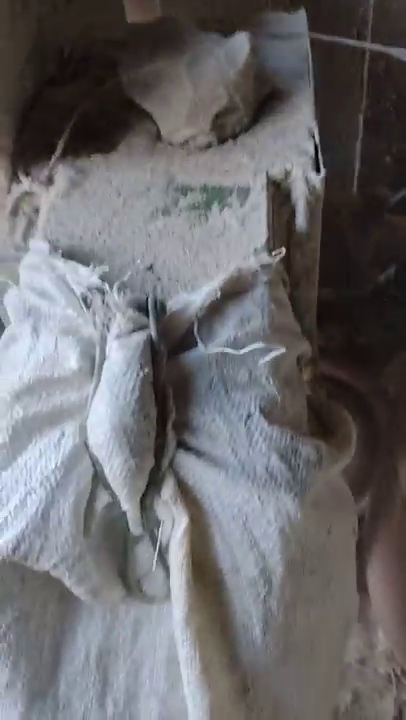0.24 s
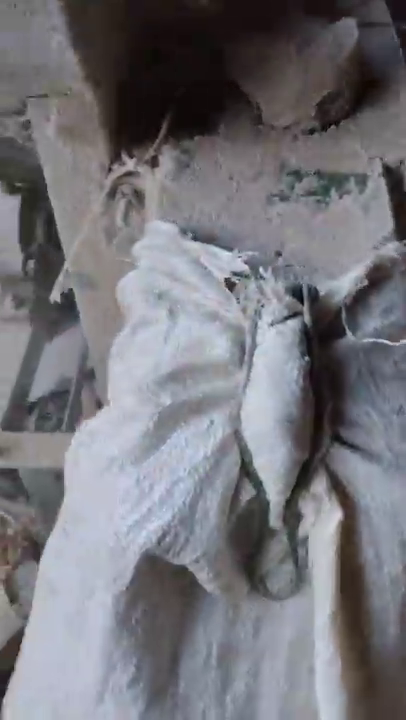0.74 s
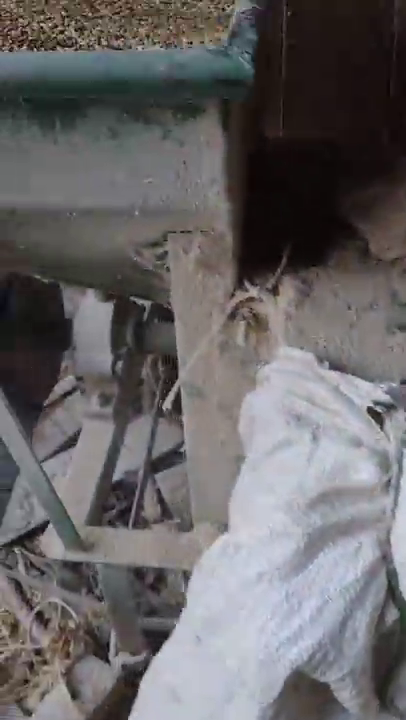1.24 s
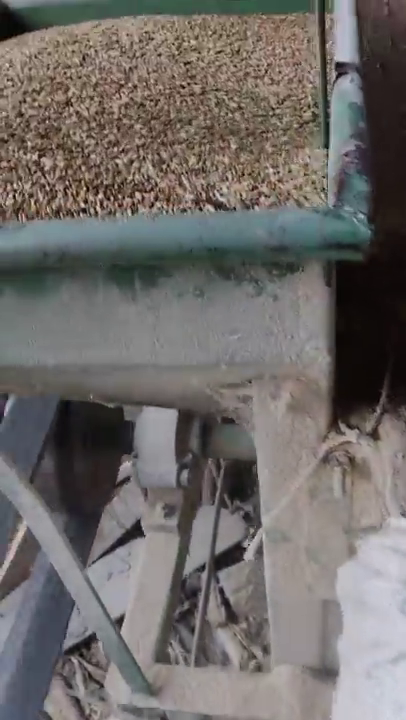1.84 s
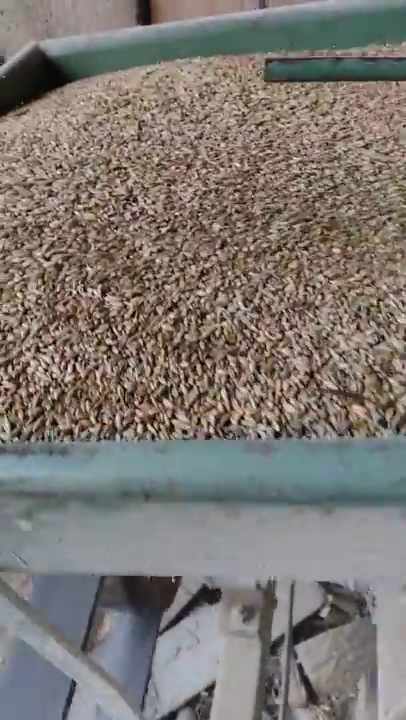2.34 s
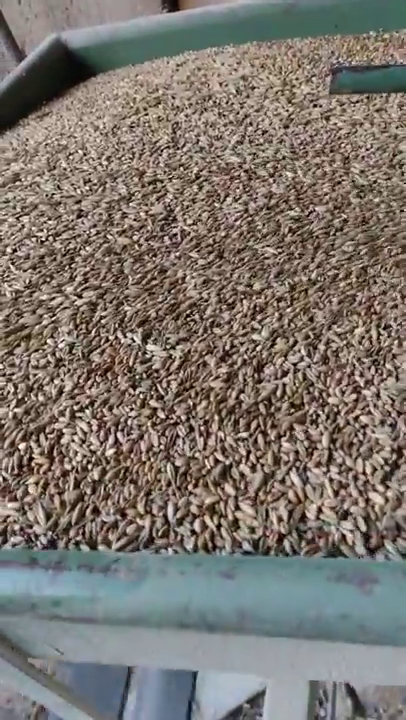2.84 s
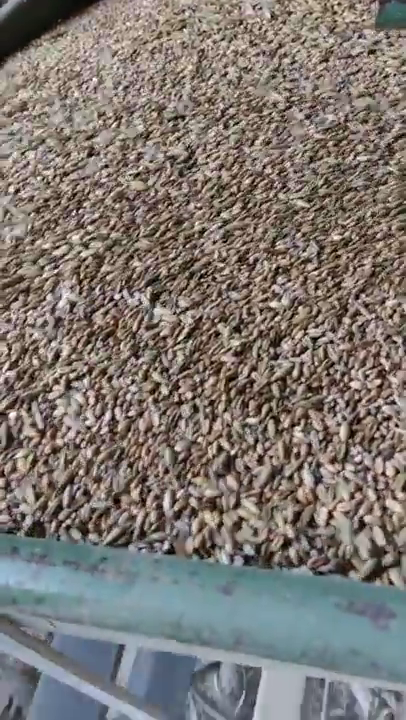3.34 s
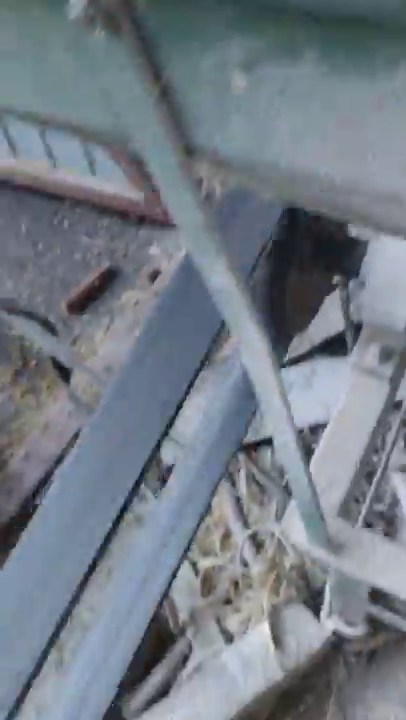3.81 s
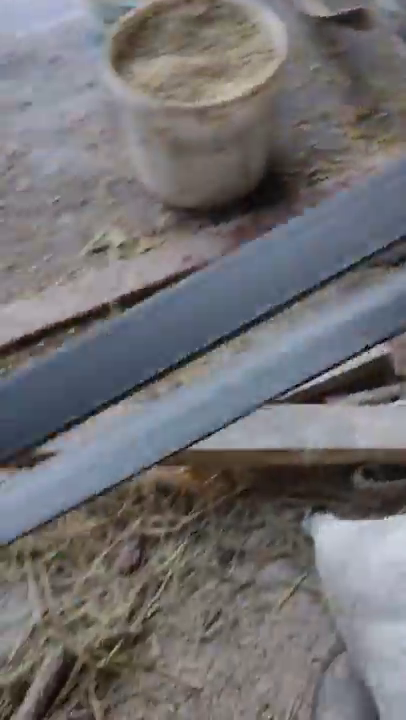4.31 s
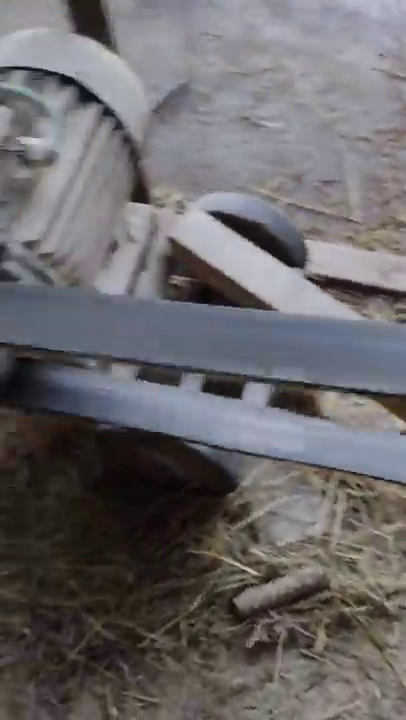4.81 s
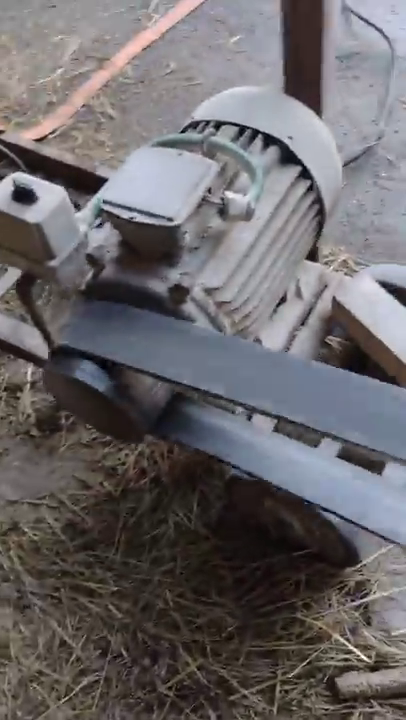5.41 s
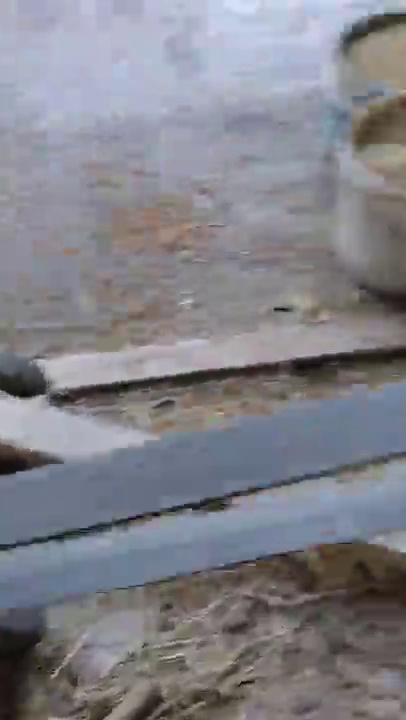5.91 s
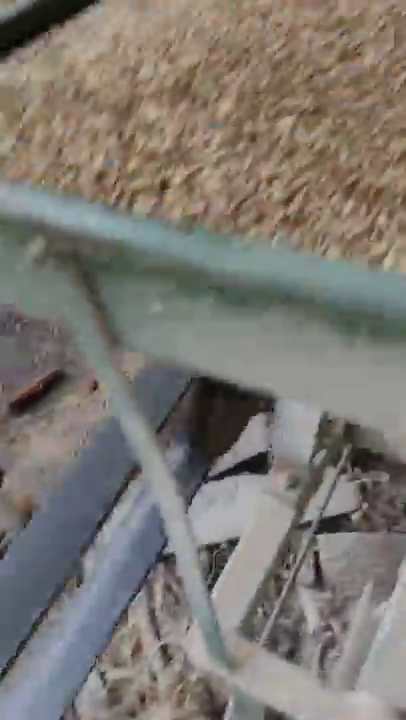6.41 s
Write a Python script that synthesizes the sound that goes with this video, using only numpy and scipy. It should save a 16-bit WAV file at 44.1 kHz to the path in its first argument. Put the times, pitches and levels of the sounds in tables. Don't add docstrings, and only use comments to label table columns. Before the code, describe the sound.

Inside a farm shed, a belt-driven mill grinds grain without pause. A bright, gritty hiss of cracking kernels rides on a low throbbing hum. The belt joint ticks about three times a second, with lighter snaps between, amid random rattles and casing knocks. A handheld stereo microphone moves from the chute past the hopper to the motor and back, its level fluttering.

```python
import sys
import numpy as np
from scipy import signal
from scipy.fft import rfft, irfft, next_fast_len
from scipy.io import wavfile
from scipy.ndimage import uniform_filter1d, map_coordinates

SR = 44100
rng = np.random.default_rng(int(sys.argv[2]) if len(sys.argv) > 2 else 0)


def store_wav(level_fs):
    pcm = np.round(np.clip(np.atleast_2d(level_fs), -1, 1) * 32767)
    wavfile.write(sys.argv[1], SR, pcm.T.astype(np.int16))


def gain_from_decibels(decibels):
    exponent = np.asarray(decibels, float) / 20
    return 10 ** exponent


N = 293706

# start_s, loudness_db, left_minus_right_db, stone_view_db
WALK_PATH = [(0.0, -28, 4, 1), (0.56, -26, 3, 1), (1.11, -28.5, 6.5, -0.5), (1.67, -26, 4.5, -0.9),
             (2.22, -25.5, 3, -0.9), (2.78, -24, 4.5, -1), (3.33, -25, 3, -1.5), (3.89, -23.5, 4.5, -1.5),
             (4.44, -20, 2.3, -3), (5.0, -25.5, 2, -6.5), (5.55, -22.5, -0.5, -6.5), (6.11, -29, 5, -4.5),
             (6.66, -22.5, 2.5, -0.5)]
# start_s, low_panel_facing_db, high_panel_facing_db, left_lag_samples, extra_shaft_path_m
MILL_BEARING = [(0, -6, -5, 1.5, 0.09), (.7, -2.5, -2.5, -2.5, 0.43), (1.35, 1.5, -1, 0, -0.32),
                (1.8, 3, 0.5, 3.5, 0.4), (2.25, 6, 2, 9, 1.26), (2.75, 4, -2, 6.5, 1.12),
                (3.25, 2.5, -2.5, 9, 1.41), (3.6, 5.5, -0.5, -2, 1.07), (3.9, 4, -2.5, -4, 0.76),
                (4.2, -9, -3.5, -7.5, 1.23), (4.75, -1.5, -4, -3.5, 0.2), (5.25, -9, -8, 8, 0.46),
                (5.75, -10, -4, 3.5, 0.11), (6.2, -7, -2.5, 9, -1.04), (6.66, 10, 1, 16, -1.68)]
LOW_PAN_DB, HIGH_PAN_DB = -1.5, -0.36
# freq_hz, likeness_0_to_1
PORT_LIKENESS = [(60, 0.9), (290, 0.9), (640, 0.66), (1400, 0.22), (3000, 0.1), (6000, 0.035),
                 (16000, 0.041)]

HUM_DB, HOUSING_DB, CRUSH_DB, HISS_DB, RING_DB = -1.58, -3, 1.5, 8, 28.5
HUM_PER_FACING, CRUSH_PER_FACING = 0.14, 0.035
DEEP_PER_FACING, DEEP_PER_VIEW = -0.53, -0.44
HOUSING_PER_VIEW = -0.29
CRUSH_PER_VIEW = 0.2

SHAFT_HZ = 17.29
SHAFT_ORDERS = [(1, -63), (2, -55), (3, -38.5), (4, -38), (5, -32.5), (6, -86), (7, -44), (8, -38),
                (9, -41.5), (10, -42.5), (11, -46), (12, -40.5), (13, -103), (14, -45), (15, -42),
                (16, -50), (17, -62), (18, -53), (19, -43), (20, -44), (21, -41.5), (22, -84), (23, -69),
                (24, -48)]
# freq_hz, density_db_per_hz
RUMBLE_SPECTRUM = [(25, 11), (40, 8), (55, 15), (75, 14.5), (110, 18), (160, 11.5), (230, 13.5),
                   (300, 20.5), (370, 13), (420, 9), (550, 13)]

LAP_S, STRONGEST_FLAP_S = 0.2967, 0.1
FLAP_SWING_DB, LAP_SWING_DB = 4, 0.5
FLAP_DB, FLAP_PER_FACING = -0.5, 0.11

# pitch_hz, left_db, right_db, wander_hz
BEARING_WHINES = [(1077, -44.5, -52, 9.0), (2140, -46, -47, 18.0)]
# pitch_hz, width_hz, left_db, right_db
HOUSING_PANELS = [(978, 140, -42, -46.5), (1092, 67, -44, -47.5), (1761, 31, -72, -44.5),
                  (2140, 170, -40, -39), (2453, 140, -41, -66), (4200, 160, -80, -55),
                  (5530, 500, -40.5, -52)]

# start_s, peak_db, pitch_hz
FRAME_THUMPS = [(0.022, -22, 211), (0.084, -13.5, 158), (0.146, -18, 151), (0.376, -19, 180),
                (0.434, -12.5, 137), (0.512, -28, 302), (0.661, -20, 142), (1.125, -17, 140),
                (1.356, -22, 137), (1.412, -20, 146), (1.473, -32, 164), (1.588, -21, 136),
                (1.643, -21, 139), (1.763, -23, 178), (1.878, -27, 157), (1.937, -19, 183),
                (1.99, -21, 213), (2.055, -23, 178), (2.127, -18, 280), (2.172, -11, 182),
                (2.227, -15, 135), (2.28, -22, 203), (2.441, -8, 135), (2.521, -12, 186),
                (2.591, -13.5, 203), (2.682, -16, 161), (2.747, -10.5, 137), (2.824, -16.5, 285),
                (2.919, -14.5, 144), (2.978, -16, 130), (3.034, -12, 133), (3.098, -9, 137),
                (3.202, -15, 145), (3.271, -14, 135), (3.319, -13.5, 145), (3.433, -13, 178),
                (3.496, -9.5, 137), (3.612, -24, 151), (3.656, -18, 141), (3.793, -17.5, 176),
                (3.845, -27, 132), (4.022, -22.5, 187), (4.314, -21, 183), (4.39, -17, 308),
                (4.599, -21, 137), (4.681, -20, 307), (4.77, -28, 186), (4.831, -19, 144),
                (4.953, -20, 356), (5.118, -9, 141), (5.269, -25, 279), (5.345, -19, 110),
                (5.388, -31, 140), (5.558, -8.5, 112), (5.703, -12.5, 304), (5.858, -29, 156),
                (5.927, -19, 135), (6.098, -19, 343), (6.388, -15, 192), (6.501, -30, 135),
                (3.543, -23, 339), (3.658, -32, 366), (4.39, -21, 325), (5.129, -19, 333),
                    (5.149, -19, 606), (5.429, -21, 366), (5.553, -26, 493), (5.591, -16, 331),
                    (5.72, -19, 377), (5.85, -22, 370), (5.875, -21, 374), (6.199, -35, 364)]
THUMP_DB, THUMP_RISE_S, THUMP_T60_S = -6, 0.0024, 0.057
# start_s, peak_db, pitch_hz
LOW_PANEL_PINGS = [(0.5666, -28, 2170), (1.4544, -33, 2140), (1.7394, -20, 2210), (1.7544, -20, 2140),
                   (2.1969, -30, 2080), (2.9494, -16, 2140), (3.3089, -27, 2140), (3.8277, -19, 2180),
                   (3.8891, -23, 2110), (4.7152, -22, 2070), (6.1963, -17, 2270), (6.4857, -15, 2150)]
# start_s, peak_db, pitch_hz
HIGH_PANEL_PINGS = [
    (0.2628, -26, 3540),
    (1.1538, -25, 3670),
    (1.2276, -28, 3730),
    (3.8277, -21, 3640),
    (3.8871, -20, 3700),
    (4.8708, -30, 3510),
    (5.4644, -23, 3500),
    (5.7694, -27, 3760),
    (6.1419, -26, 3650),
    (6.1963, -22, 3640),
]
PING_DB, PING_RISE_S, PING_T60_S = -5.5, 0.0016, 0.12
# start_s, peak_db, pitch_hz
PLATE_SQUEAKS = [
    (0.678, -22, 905),
    (1.006, -26, 1910),
    (1.008, -28, 2490),
    (1.012, -28, 990),
    (1.036, -27, 1700),
    (1.205, -23, 1040),
    (1.385, -25.5, 1110),
    (6.046, -27, 4800),
    (6.064, -29, 4600),
    (5.705, -25, 5700),
]
SQUEAK_DB, SQUEAK_RISE_S, SQUEAK_T60_S = -5, 0.0025, 0.05

# start_s, clack_db, snap_db, left_minus_right_db
MILL_PULLEY_TICKS = [(0.2637, -0.5, -20, 1), (0.5604, -4, -26, 11), (0.8568, -4, -16, -5),
                     (1.1543, -5, -14, 10), (1.4507, 0, -21, 9), (1.7544, -9, -19, 18),
                     (2.0457, -14.5, -20, 21), (2.3422, -7, -14, 6), (2.6395, -5, -18, 14),
                     (2.9362, -8, -12, 2.0), (3.2333, -4, -25, 5), (3.5308, -16, -19, 15),
                     (3.8275, -3, -13, 6), (4.1223, 0.5, -11, 6), (4.4191, -9, -14, 3),
                     (4.716, 0.5, -26, 0), (5.0131, -7, -16, 12), (5.3098, -7, -22, 12),
                     (5.606, -8, -16, 15), (5.9018, 1, -20, 0), (6.1976, -7, -16, 10),
                     (6.4934, -2, -16, -3)]
TICK_TILTS_DB = [5, 6, -7, 3, -5, -4, -18, -3, -2, 2, -6, 0.1, 0.1, 3, 7, 3, -3, 9, 3, -6, -16, -3]
TILT_PIVOT_HZ = 3200
# start_s, snap_db, left_minus_right_db
MOTOR_PULLEY_SNAPS = [(0.1133, -15, -6), (0.4166, -10.5, -5), (0.7136, -15, 3.5), (1.009, -10, -1),
                      (1.297, -15, -3), (1.6028, -10, 7), (3.3874, -13, 5), (3.683, -15, -1),
                      (3.9783, -12, 9), (4.274, -13, 13), (4.5707, -17.5, 7), (4.8671, -14, 0),
                      (5.164, -18, 11), (5.4597, -14, 9), (5.756, -13, 7), (6.0522, -17, -7),
                      (6.3486, -9, 2), (6.6452, -15, 1)]
SNAP_CLACK_DB = -9
# freq_hz, level_db, t60_s
CLACK_MODES = [(2150, -26, 0.061), (2520, -11, 0.0044), (2980, -10, 0.0087), (3320, -12.5, 0.01),
               (3687, -14.5, 0.023), (4100, -9.5, 0.0043)]
# freq_hz, level_db, t60_s
BRIGHT_MODES = [(5900, 10.5, 0.0014), (7370, 2.5, 0.0083), (8660, 9.5, 0.0046), (10300, 9.5, 0.0026),
                (13500, 4.5, 0.0014)]
# start_s, clack_db, snap_db, left_minus_right_db
KERNEL_RATTLES = [(0.052, -16, -15, -7), (0.4753, -5, -25, -1), (0.508, -7, -9, -6), (0.615, -29, -27, -3),
                  (0.6366, -20, -12, 1), (0.748, -13, -25, -2), (0.9202, -27, -18, 2),
                  (1.0393, -22, -20, -2), (1.1373, -21, -23, 4.5), (1.173, -30, -15, -5),
                  (1.5275, -27, -14, 1), (1.579, -33, -10, -4), (1.7358, -8, -20, 6),
                  (2.026, -11, -11, -15), (2.318, -26, -21, 2), (4.3969, -11, -28, 8),
                  (4.497, -39, -19, -13), (4.686, -6, -16, 12), (4.8189, -13, -18, -14),
                  (4.951, -27, -17, 4), (5.2623, -36, -15.5, -6), (5.394, -35, -13, 8),
                  (5.4055, -37, -14, -4), (5.744, -25, -17, -1), (5.866, -11, -20, 10),
                  (5.972, -30, -15, 0), (6.171, -7, -19, 2), (6.245, -10, -16, 6), (6.4727, -5, -23, 7),
                  (6.4864, -5, -15, 9)]
# start_s, peak_db, left_minus_right_db
KERNEL_BURSTS = [(0.8823, -20, -3), (1.14, -16, 5.5), (1.3834, -29, 2), (3.3594, -17, 0), (3.4844, -21, -2),
                 (3.559, -18, 2.5), (3.5994, -29, -1), (3.7828, -21, 4.0), (3.8783, -20, 5),
                 (3.9507, -12, 6), (4.0692, -19, 4.5), (4.669, -16, 13), (4.931, -23, 8), (5.109, -18, 1.5),
                 (5.551, -13, 9), (5.71, -22, 0.0), (5.7423, -16, 2.0), (5.93, -15, 6), (5.9549, -17, -2.0),
                 (6.0102, -26, -2.5), (6.0342, -20, 0.0), (6.127, -17, 0.5), (6.14, -14, 5),
                 (6.26, -17, 0.5), (5.435, -21, 0.5)]
STRAY_COUNT = 6
STRAY_CLACK_DB, STRAY_SNAP_DB, STRAY_SPREAD_DB, STRAY_PAN_DB = -33, -19, 3.0, 6.0
# start_s, peak_db, left_minus_right_db
CASING_KNOCKS = [(0.187, -14, -2), (0.3087, -13, -4), (0.3244, -30, 1.0), (0.614, -8, 1),
                 (0.8145, -21, 2.0), (1.0095, -23, 1.5), (1.038, -13, -0.5), (1.228, -12, 6),
                 (1.3832, -16, 3.0), (1.5188, -9.5, 6), (2.198, -8, 4.5), (3.3865, -16, 9.0),
                 (3.6487, -18, -0.5), (3.718, -14, 3.5), (4.0088, -18, 3.0), (4.472, -18, 0.5),
                 (4.5705, -27, 0.5), (4.8105, -9, -4.0), (4.9693, -20, 3.5), (5.1053, -21, 3.0),
                 (5.275, -22, 1), (5.5464, -14, 5), (5.853, -17, 0.5), (6.4276, -11, 5),
                 (6.5869, -20, -1.0)]
# freq_hz, level_db, t60_s
CASING_MODES = [(1460, -10, 0.0033), (2200, -7, 0.0027), (3700, -7, 0.0028), (5640, -2.5, 0.0012)]
KNOCK_LATE_S = 0.0012

# freq_hz, density_db_per_hz
LEFT_PORT = [(450, -2.5), (650, -3), (900, -7.5), (1400, -6), (2000, -6.5), (2800, -7.5), (4000, -5),
             (5000, -10.5), (6500, -6.5), (8000, -2.5), (9200, 2.5), (10800, 4.5), (12800, -0.5),
             (15500, -7)]
# freq_hz, density_db_per_hz
RIGHT_PORT = [(450, -1.5), (650, -8.5), (900, -6), (1400, -9), (2000, -11), (2800, -8), (4000, -5),
              (5000, -4.5), (6500, -1.5), (8000, 3.5), (9200, 4.5), (10800, -2), (12800, -3.5), (15500, -9)]
CRACK_S = 0.0007

# start_s, left_drop_db, right_drop_db, hold_s, spring_back_db
MOTOR_AIR_PUSHES = [(0.11, 4, 4.5, 0.089, -3.5), (0.391, 2.5, 3, 0.07, 0), (0.685, 1.5, 2, 0.12, 1.5),
                    (1.023, 3, 1, 0.12, 1), (1.282, 3, 2.5, 0.1, 1.6), (1.571, 2.5, 4.5, 0.1, 1.5),
                    (1.875, 0.5, 0.5, 0.096, 1), (2.192, -1, 1.5, 0.085, 1), (2.495, 0.5, 3.5, 0.11, 2.5),
                    (2.784, 2, 4.5, 0.1, 2), (3.075, -0.3, 3, 0.14, 5.5), (3.377, 0.7, 6.5, 0.093, 0.5),
                    (3.678, 5.5, 8.5, 0.11, -1.5), (3.967, 4, 5.5, 0.1, -0.5), (4.266, 3, 10, 0.086, -2.5),
                    (4.556, 8.5, 9.5, 0.1, -5.5), (4.862, 7, 6.5, 0.081, -2),
                    (5.156, 7.5, 11.5, 0.11, -0.5), (5.451, 7.5, 10.5, 0.098, 3), (5.748, 4, 7, 0.1, 2.5),
                    (6.037, 1.5, 3, 0.08, 3), (6.345, 2.5, 4, 0.11, 0), (6.633, 5, 12, 0.12, 1.2)]
# start_s, left_drop_db, right_drop_db, hold_s, spring_back_db
MILL_AIR_PUSHES = [(0.298, 2.7, 4.6, 0.1, 1.2), (0.552, 1.3, 4, 0.14, 1.2), (0.853, 5.7, 4.1, 0.15, 2.4),
                   (1.145, 0.5, 3.6, 0.1, 0.85), (1.446, 1.6, 1.9, 0.11, 1.2),
                   (1.73, 1.4, 0.65, 0.081, 0.51), (2.036, 2.8, 5.3, 0.091, 0.75),
                   (2.313, 2.6, 4.1, 0.11, 3.2), (2.632, 1.1, 6.1, 0.089, 0.92),
                   (2.917, 1.3, 2.8, 0.11, 0.53), (3.213, 1.6, 4.8, 0.084, 1.5),
                   (3.534, 2.6, 4.1, 0.12, 2.1), (3.806, 0.42, 0.83, 0.069, 0.79),
                   (4.121, 2.1, 5.1, 0.13, 1), (4.412, 5.5, 5.6, 0.141, 0.64), (4.722, 3.2, 4, 0.099, 0.64),
                   (5.013, 2, 1.7, 0.088, 4.9), (5.305, 3, 2, 0.087, 0.54), (5.598, 2.6, 5.6, 0.1, 1.4),
                   (5.901, 2.4, 1.1, 0.12, 1.2), (6.225, 2.2, 3.2, 0.13, 1.2),
                   (6.485, 3.7, 3.2, 0.13, 0.88)]
OVERSHOOT, SETTLE_S = 1, 0.056
LOOK_AHEAD_S, FIRST_SHARE, FIRST_S = 0.0045, 0.73, 0.011
SPRING_S, EDGE_S, RELEASE_S = 0.092, 0.0045, 0.011

TOP_CUT_HZ = 15740


def rms_one(x):
    return x / np.sqrt(np.mean(x ** 2) + 1e-20)


def at_hz(points, hz):
    table_hz, values = np.array(points).T[:2]
    return np.interp(np.log(hz + 1), np.log(table_hz), values)


def in_time(rows):
    s, *columns = np.transpose(rows)
    return [np.interp(np.arange(N) / SR, s, c) for c in columns]


def drift(rate):
    r = np.exp(-80 * np.pi * rate / SR)
    noise = rng.standard_normal(N // 40 + 2002)
    slow = signal.lfilter([1], [1, -2 * r, r * r], noise)[2000:]
    return np.interp(np.arange(N) / 40, np.arange(len(slow)), rms_one(slow))


def ring(clicks, hz, t60):
    r, w = gain_from_decibels(-60 / (t60 * SR)), 2 * np.pi * hz / SR
    return signal.lfilter([0, np.sin(w)], [1, -2 * r * np.cos(w), r * r], clicks + 1e-18)


def pan(db):
    return gain_from_decibels(np.multiply.outer([.5, -.5], db))


def stereo_band(white, left, right, low_hz, high_hz):
    size = next_fast_len(N)
    hz = np.fft.rfftfreq(size, 1 / SR)
    mid, side = rfft(white, size)
    alike = np.clip(at_hz(PORT_LIKENESS, hz), 0, 1)
    pair = np.sqrt(1 + alike) * mid + np.sqrt(1 - alike) * side * [[1], [-1]]
    edges = 1 / np.sqrt((1 + (low_hz / (hz + 1)) ** 8) * (1 + (hz / high_hz) ** 8))
    colour = gain_from_decibels([at_hz(left, hz), at_hz(right, hz)])
    return rms_one(irfft(pair * edges * colour, size)[:, :N])


def flap_db(facing_db):
    lap = 2 * np.pi * (np.arange(N) / SR - STRONGEST_FLAP_S) / LAP_S
    swing_db = FLAP_SWING_DB * np.cos(4 * lap) + LAP_SWING_DB * np.cos(lap)
    return FLAP_DB + FLAP_PER_FACING * facing_db + swing_db


def hum(level_db, deep_db, middle_db, path_m):
    turn = 2 * np.pi * SHAFT_HZ * (np.arange(N) / SR - path_m / 343)
    lines = 0
    for k, db in SHAFT_ORDERS:
        phase = .03 * k * k - np.pi * (k < 3.5)
        phase += rng.uniform(0, 2 * np.pi) * (k > 8.5)
        order_db = db + 0.36 * drift(2.1) + deep_db * (k < 6.5) + middle_db * (6.5 < k < 9.5)
        lines = lines + np.sqrt(2) * gain_from_decibels(order_db) * np.cos(k * turn + phase)
    white = rng.standard_normal((2, N))
    rumble = stereo_band(white, RUMBLE_SPECTRUM, RUMBLE_SPECTRUM, low_hz=15, high_hz=440)
    throb = gain_from_decibels(1.05 * np.cos(turn - .5) + 1.14 * drift(14))
    return gain_from_decibels(level_db + 26.5) * (lines + gain_from_decibels(-29.5) * throb * rumble)


def whine(low_db, high_db):
    out = 0
    for (hz, left_db, right_db, wander_hz), facing_db in zip(BEARING_WHINES, [low_db, high_db]):
        phase = 2 * np.pi * np.cumsum(hz + wander_hz * drift(5.83)) / SR
        swell = gain_from_decibels(facing_db + 2.5 * drift(11.0))
        out = out + gain_from_decibels([[left_db], [right_db]]) * swell * np.sin(phase)
    return out


def housing(low_db, high_db):
    out = np.zeros((2, N))
    for hz, width_hz, left_db, right_db in HOUSING_PANELS:
        t60_s = np.log(1000) / (np.pi * width_hz)
        rung = rms_one(ring(rng.standard_normal((2, N)), hz, t60_s))
        facing_db = low_db * (1000 < hz < 1500) + high_db * (1500 < hz < 2300)
        out += gain_from_decibels([[left_db], [right_db]]) * rung * gain_from_decibels(facing_db + 2.4 * drift(8))
    return out


def thumps(rows, level_db, rise_s, t60_s, gain_db):
    out, t = np.zeros(N + SR), np.arange(int(.15 * SR)) / SR
    shape = (1 - np.exp(-t / rise_s)) * gain_from_decibels(-60 * t / t60_s)
    shape = shape / shape.max()
    for s, db, hz in rows:
        at = int(s * SR)
        height = gain_from_decibels(db + level_db - gain_db[:, at].mean())
        out[at:at + len(t)] += height * shape * np.sin(2 * np.pi * hz * t)
    return out[:N]


def blow_rows():
    snaps = [(s, db + SNAP_CLACK_DB, db, side) for s, db, side in MOTOR_PULLEY_SNAPS]
    bursts = [(s + KNOCK_LATE_S, db + SNAP_CLACK_DB, db, side) for s, db, side in KERNEL_BURSTS]
    luck = rng.standard_normal((STRAY_COUNT, 3)) * [STRAY_SPREAD_DB, STRAY_SPREAD_DB, STRAY_PAN_DB]
    strays = np.c_[rng.uniform(0, N / SR, STRAY_COUNT), luck + [STRAY_CLACK_DB, STRAY_SNAP_DB, 0]]
    return np.r_[MILL_PULLEY_TICKS, snaps + bursts, KERNEL_RATTLES, strays]


def blows(rows, modes, level_db, rebound_db, gain_db, tilt_db=0):
    luck_db = rng.normal(0, 2.5, (len(rows), 3, len(modes)))
    late_s = rng.uniform(0.0013, 0.0045, (len(rows), 3)) * np.arange(3)
    out = np.zeros((2, N))
    for k, (hz, db, t60) in enumerate(modes):
        clicks = np.zeros((2, N))
        colour_db = db + tilt_db * np.log2(hz / TILT_PIVOT_HZ)
        for bounce in range(3):
            at = np.minimum(((rows[:, 0] + late_s[:, bounce]) * SR).astype(int), N - 1)
            blow_db = level_db + colour_db + luck_db[:, bounce, k] + rebound_db * bounce
            clicks[:, at] += gain_from_decibels(blow_db - gain_db[:, at]) * pan(rows[:, -1])
        out += (-1) ** k * ring(clicks, hz, t60)
    return out


def hits(gain_db):
    rows = blow_rows()
    tilts_db = np.r_[TICK_TILTS_DB, np.zeros(len(rows) - len(MILL_PULLEY_TICKS))]
    clacks = blows(rows, CLACK_MODES, rows[:, 1] - 2.3, -12, gain_db, tilts_db)
    knock_rows = np.array(CASING_KNOCKS) + [KNOCK_LATE_S, 0, 0]
    knocks = blows(knock_rows, CASING_MODES, knock_rows[:, 1] + 3.4, -6, gain_db)
    snaps = blows(rows, BRIGHT_MODES, rows[:, 2] - 7.0, -9, gain_db)
    return clacks + knocks + snaps


def cracking(per_s, spread_db, share):
    sizes = gain_from_decibels(spread_db * np.minimum(rng.exponential(1, (2, N)), 4))
    force = sizes * (rng.random((2, N)) < per_s * gain_from_decibels(4 * drift(30)) / SR)
    r = np.exp(-1 / (CRACK_S * SR))
    power = signal.lfilter([1], [1, -2 * r, r * r], force ** 2 + 1e-18)
    share = np.clip(share, 0, 1)
    return np.sqrt(share * power / power.mean() + 1 - share) * rng.standard_normal((2, N))


def grinding(body_db, crush_db, hiss_db, low_pan, high_pan):
    coarse = cracking(per_s=1100, spread_db=6.5, share=0.41) * gain_from_decibels(0.23 * drift(28))
    fine = cracking(per_s=800, spread_db=8.5, share=0.27)
    body = stereo_band(coarse, LEFT_PORT, RIGHT_PORT, low_hz=436, high_hz=2960)
    body *= gain_from_decibels(body_db - 3.0 + 1.07 * drift(4.7))
    crush = stereo_band(coarse, LEFT_PORT, RIGHT_PORT, low_hz=3010, high_hz=6990)
    crush *= gain_from_decibels(crush_db - 3.0 + 1.4 * drift(3.8))
    hiss = stereo_band(fine, LEFT_PORT, RIGHT_PORT, low_hz=7140, high_hz=21200)
    hiss *= gain_from_decibels(hiss_db - 0.92 + 0.42 * drift(17))
    return body * pan(low_pan - 3.0) + (crush + hiss) * pan(high_pan - 1.6)


def pump_db():
    out, t = np.zeros((2, N)), np.arange(int(.4 * SR)) / SR
    for s, left_db, right_db, hold_s, back_db in MOTOR_AIR_PUSHES + MILL_AIR_PUSHES:
        held = t < hold_s + LOOK_AHEAD_S
        drop = np.where(t < FIRST_S, FIRST_SHARE, 1 + OVERSHOOT * np.exp(-t / SETTLE_S)) * held
        spring = back_db * np.exp((hold_s - t) / SPRING_S) * ~held
        at = int((s - LOOK_AHEAD_S) * SR)
        out[:, at:at + len(t)] += (spring - np.outer([left_db, right_db], drop))[:, :N - at]
    fast = uniform_filter1d(out, size=int(EDGE_S * SR), axis=1, mode="nearest")
    size = int(RELEASE_S * SR)
    slow = uniform_filter1d(out, size=size, axis=1, mode="nearest", origin=size // 4)
    return np.minimum(fast, slow + 1.5)


def scene():
    walk_db, side_db, view_db = in_time(WALK_PATH)
    facing_db, high_facing_db, lag, path_m = in_time(MILL_BEARING)
    gain_db = pump_db()
    low_pan, high_pan = side_db + LOW_PAN_DB, side_db + HIGH_PAN_DB
    hidden_db = np.minimum(view_db, 0)
    deep_db = DEEP_PER_FACING * np.maximum(facing_db, 0) + DEEP_PER_VIEW * hidden_db

    low = hum(walk_db + HUM_DB + HUM_PER_FACING * facing_db, deep_db, flap_db(facing_db), path_m)
    low += thumps(FRAME_THUMPS, THUMP_DB, THUMP_RISE_S, THUMP_T60_S, gain_db)
    low += thumps(LOW_PANEL_PINGS + HIGH_PANEL_PINGS, PING_DB, PING_RISE_S, PING_T60_S, gain_db)
    low += thumps(PLATE_SQUEAKS, SQUEAK_DB, SQUEAK_RISE_S, SQUEAK_T60_S, gain_db)
    rung = whine(facing_db, high_facing_db) + housing(facing_db, high_facing_db)
    body_db = walk_db + HOUSING_DB + HOUSING_PER_VIEW * hidden_db
    crush_db = walk_db + CRUSH_DB + CRUSH_PER_FACING * facing_db + CRUSH_PER_VIEW * view_db
    ground = grinding(body_db, crush_db, walk_db + HISS_DB + view_db, low_pan, high_pan)

    mill = low * pan(low_pan) + rung * gain_from_decibels(walk_db + RING_DB) + ground
    mill[0] = map_coordinates(mill[0], [np.arange(N) - lag], order=3, mode="nearest")
    return mill + hits(gain_db)


def band_limit(x):
    return signal.sosfilt(signal.butter(12, 16750, fs=SR, output="sos"), x)


def record(dry):
    pumped = .74 * np.tanh(dry * gain_from_decibels(pump_db()) / .74)
    top_cut = signal.ellip(14, .5, 70, TOP_CUT_HZ, fs=SR, output="sos")
    mix = signal.sosfilt(top_cut, pumped)
    return band_limit(mix)


dry = scene()
out = record(dry)
store_wav(out)
```